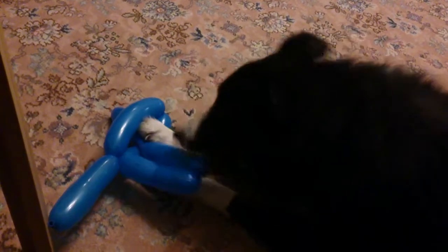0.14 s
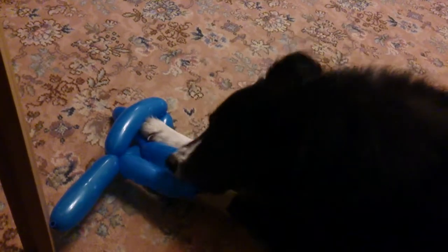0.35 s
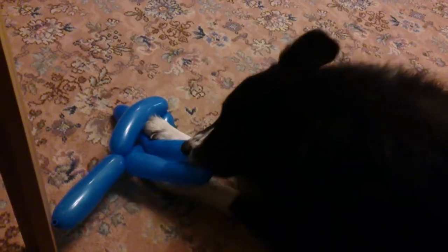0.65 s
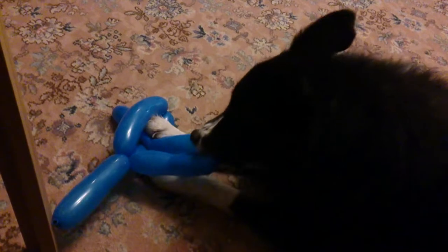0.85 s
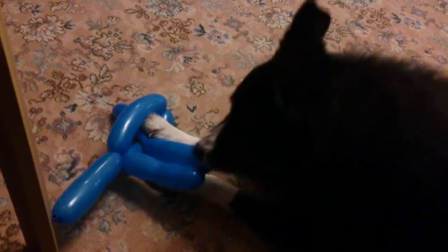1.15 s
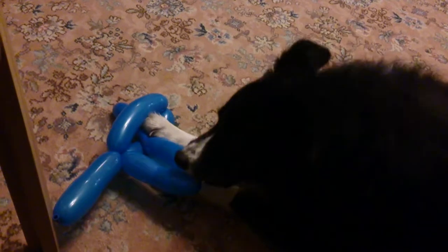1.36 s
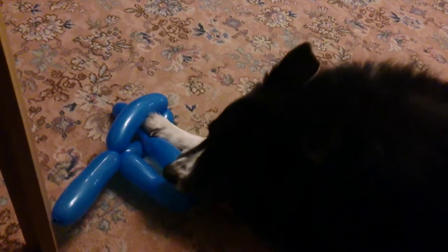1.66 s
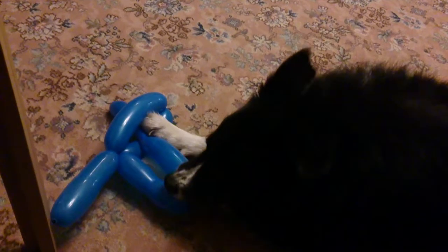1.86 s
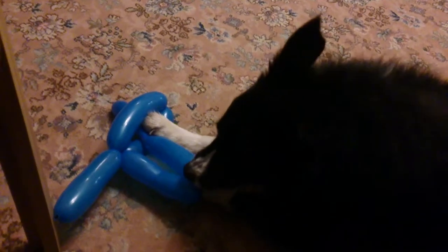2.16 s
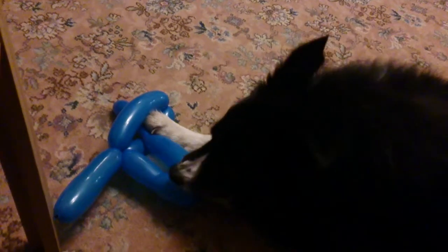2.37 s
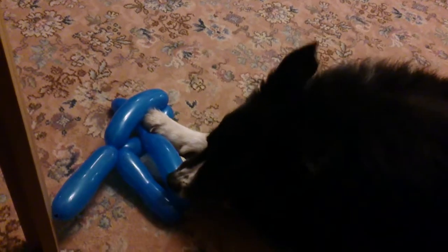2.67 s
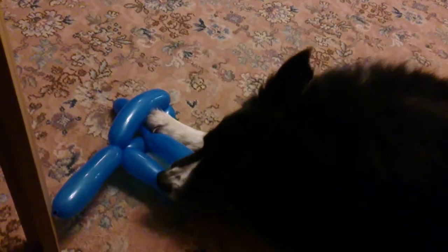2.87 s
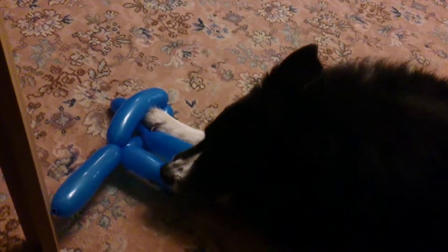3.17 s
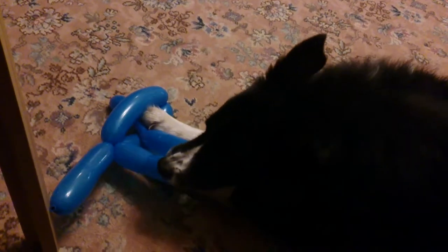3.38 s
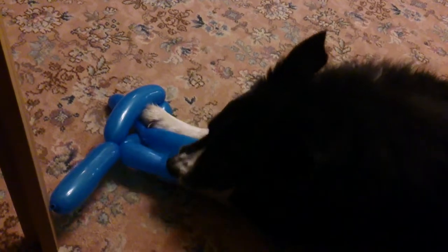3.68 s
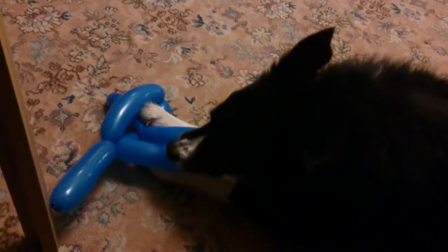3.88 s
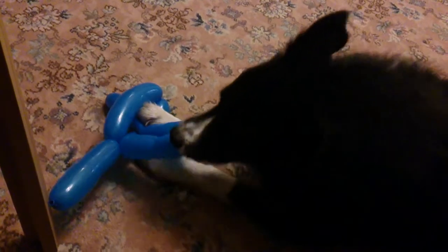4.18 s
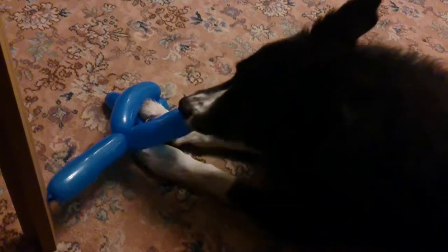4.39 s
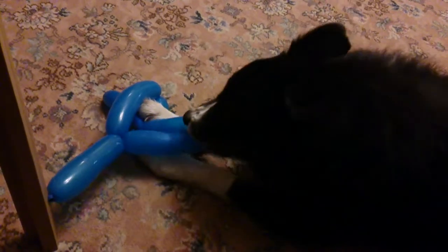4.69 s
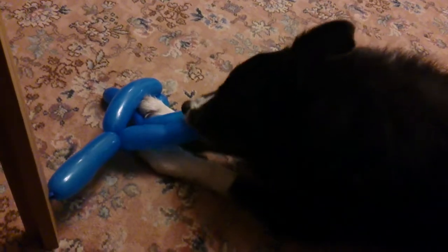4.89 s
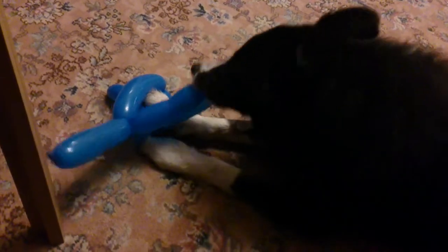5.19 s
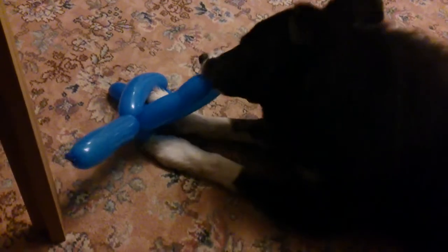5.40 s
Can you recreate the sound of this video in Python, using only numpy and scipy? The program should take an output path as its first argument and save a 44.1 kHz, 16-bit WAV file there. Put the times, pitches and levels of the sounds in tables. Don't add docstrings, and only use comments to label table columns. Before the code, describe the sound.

A dog gnaws a twisted latex balloon close by, with rubbery creaks, dry crackling scrapes, brief squeals and sharp snaps in a small room.

```python
import sys
import numpy as np
from scipy import signal
from scipy.fft import rfft, irfft, next_fast_len
from scipy.io import wavfile
from scipy.ndimage import uniform_filter1d, map_coordinates

SR = 44100
rng = np.random.default_rng(int(sys.argv[2]) if len(sys.argv) > 2 else 0)


def to_wav(sig):
    pcm = np.clip(np.atleast_2d(sig), -1, 1) * 32767
    pcm = np.round(pcm).astype(np.int16)
    wavfile.write(sys.argv[1], SR, pcm.T)


def rack_gain(trim_db):
    fader = np.asarray(trim_db, float)
    return 10 ** (fader / 20)


N = 244314

# t/s, skin level/dB, air tube minus skin/dB, crackle minus skin/dB
SNAPS = [(.0337, -18.5, 5.5, -32), (.049, -13.5, -23, -5), (.0605, -28, -14, -30), (.34, -26.5, -28, -4),
         (.972, -4.5, -8, -1), (.9887, -7, 1, -4.5), (1.3811, -17, -2, -8.5), (1.4422, -18.5, -2.5, -10),
         (1.5429, -14, -7, -3.5), (1.6873, -19, -43, -26), (1.8443, -27, -13, -19), (2.1735, -9, -4.5, 4.5),
         (2.4716, -17, -8, 0), (2.6786, -12.5, 1, 4.5), (3.4091, -10.5, -3.5, -3.5),
         (3.4489, -32.5, 10.5, -4), (3.9267, -19, -11.5, -5), (3.9953, -24.5, -5, -36),
         (4.0139, -19, -4, -11), (4.0436, -26.5, -0.5, -9), (4.329, -24.5, -6.5, 2),
         (4.3618, -11.5, -2.5, -12), (4.3745, -38, 19, -16), (4.4745, -29, -3, -5.5),
         (4.8129, -25, -2.5, -5.5), (4.9434, -16.5, -5, -9.5), (5.079, -15.5, -10.5, 2.5),
         (5.3417, -14, -3, -4.5), (5.355, -40.5, -28, -21)]
# t/s, skin level/dB, crackle minus skin/dB
NIBBLES = [(.3328, -38, -2.5), (1.321, -33.5, -14), (2.3814, -33, -14.5), (2.777, -28, -9),
           (3.5203, -36.5, -13), (4.6851, -26.5, -32.5), (5.1914, -39.5, 14), (5.2084, -34, 3),
           (.23, -55, 12), (.286, -58, 12), (5.316, -51, -1)]
# t/s, skin level/dB, crackle minus skin/dB
GRIPS = [(1.373, -24.5, -12), (2.4, -31, -14), (2.9841, -25.5, -28), (3.02, -23.5, -16),
         (3.0369, -22.5, -8), (3.058, -26, -14.5), (3.0704, -39, 0), (3.1899, -20.5, -7.5),
         (3.2069, -20.5, -12), (4.082, -29, -19), (5.1788, -37, 9), (4.752, -28, -11)]
NIBBLE_TUBE_DB, GRIP_TUBE_DB = -26, -1

# start t/s, end t/s, start skin level/dB, end skin level/dB, crackle minus skin/dB
SCRAPES = [(0.412, 0.48, -36, -44.5, -10), (0.476, 0.572, -38, -39, -13), (0.572, 0.62, -40, -41, -12),
           (0.62, 0.71, -43, -49, -16), (0.724, 0.77, -43, -49, -18), (0.77, 0.883, -46, -45, -20),
           (.883, 0.968, -43, -46, -20), (1.318, 1.331, -52, -42, -21), (1.347, 1.377, -42, -28.5, -10.5),
           (1.54, 1.646, -33.5, -41, -11), (1.648, 1.701, -40, -49.5, 9), (1.881, 1.902, -48, -44, -26),
           (1.898, 1.935, -39, -39.5, -9.5), (2.782, 2.807, -32, -46, -20), (2.832, 2.864, -41, -38, -14),
           (2.959, 3.02, -41.5, -27, -22), (3.017, 3.097, -31, -36, -23), (3.183, 3.205, -24.5, -47, -20),
           (3.758, 3.803, -41.5, -36.5, -14), (3.808, 3.89, -37.5, -39.5, -13),
           (3.888, 3.917, -37, -41.5, -16), (4.203, 4.242, -63, -42.5, -0.5), (4.65, 4.772, -36, -39, -29),
           (4.796, 4.951, -39, -35, -22), (4.973, 5.08, -44.5, -43.5, -12)]
# start t/s, end t/s, start skin level/dB, end skin level/dB
RUBS = [(0, 0.024, -29.5, -45), (0.018, 0.06, -44, -23), (.105, 0.327, -62, -68),
        (0.325, 0.355, -39, -43.5), (0.392, 0.43, -45, -27), (1.185, 1.32, -59, -64),
        (1.404, 1.535, -47.5, -48.5), (1.708, 1.806, -48, -40), (1.932, 2.128, -48, -53),
        (2.225, 2.292, -33, -65), (2.303, 2.377, -48, -48), (2.394, 2.46, -41, -35.5),
        (2.46, 2.557, -28, -50), (2.546, 2.685, -40, -46.5), (2.747, 2.797, -71, -50),
        (2.872, 2.947, -35.5, -45), (3.1, 3.126, -32, -44.5), (3.152, 3.16, -31, -49),
        (3.219, 3.408, -44, -46), (3.664, 3.742, -67, -66), (3.948, 4.005, -49.5, -54),
        (4.007, 4.158, -42, -51), (4.163, 4.327, -58, -51.5), (4.519, 4.662, -54.5, -41),
        (5.08, 5.225, -40.5, -53.5), (5.208, 5.332, -53.5, -56), (5.397, 5.536, -67, -71.5)]
SCRAPE_TUBE_DB, RUB_TUBE_DB, RUB_CRACKLE_DB = -8, -1, -15

# t/s, length/s, level/dB, crackle minus skin/dB
CHATTERS = [(.438, .004, -32, -1.5), (.451, 0.003, -30.5, -9.5), (.4784, 0.0032, -25.5, -5),
            (.483, .003, -29, -8), (.495, .005, -21, -17.5), (.539, 0.0034, -28, -10.5),
            (.59, .004, -23.5, -19), (3.088, 0.002, -35, -3), (3.182, 0.0025, -27, -20.5),
            (.631, 0.0033, -29.5, -13), (.636, 0.0082, -26.5, -23.5), (.645, 0.003, -22, -28),
            (.678, 0.0064, -26.5, -22.5), (.687, 0.0035, -26.5, -22.5), (.723, 0.0043, -22.5, -23),
            (.733, 0.0051, -30, -20), (.77, 0.011, -32, -15), (.778, 0.0055, -28, -9.5),
            (.789, .003, -38, -2), (.807, 0.0047, -30.5, -15.5), (.818, 0.0059, -28, -17.5),
            (.83, .004, -42.5, -7.5), (.849, 0.0093, -29.5, -24), (.861, 0.0047, -36, -14.5),
            (.87, 0.0022, -39, -20), (.889, .006, -30, -22), (.901, .003, -40, -18),
            (.912, .003, -37, -9.5), (.934, .002, -43, -8), (.943, .003, -42, -10.5),
            (.953, .003, -46, -20.5), (.962, .003, -41.5, -12.5), (1.62, 0.011, -37, -0.5),
            (1.737, 0.0027, -33.5, -6), (1.747, .004, -31, -13), (1.758, .005, -27.5, -13),
            (1.78, 0.0017, -34, -10), (1.785, 0.0017, -29, -13), (1.791, 0.003, -28.5, -17),
            (2.507, 0.0033, -29, -15), (2.5274, 0.0045, -25, -21), (2.539, 0.0038, -27, -18),
            (2.559, 0.0027, -40.5, -10.5), (2.578, 0.0047, -32, -9), (2.831, 0.002, -22, -11.5),
            (2.843, 0.0072, -31, -20), (2.911, .003, -35.5, -4), (2.924, 0.0035, -40.5, -1),
            (2.937, 0.0027, -42, -6)]
# t/s, length/s, level/dB, crackle minus skin/dB
NIPS = [(.422, 0.0055, -33.5, -2), (.512, 0.0065, -21.5, -5), (.522, 0.0021, -22, -16.5),
        (.5315, 0.0034, -22, -7), (.545, 0.0042, -28, -10), (.5555, 0.0027, -18.5, -13.5),
        (.584, 0.0033, -19, -16), (.605, 0.0026, -21.5, -25)]
# t/s, length/s, level/dB, crackle minus skin/dB
GNAWS = [(2.45, 0.0047, -25.5, -14.5), (2.461, 0.0028, -20.5, -12), (2.482, 0.0093, -28.5, -17.5),
         (2.491, 0.0037, -31, -26), (3.093, 0.0056, -28.5, -25), (3.101, 0.004, -19.5, -21),
         (3.109, 0.0025, -26, -20), (3.153, 0.0043, -32, -18), (3.249, 0.0031, -36, -6),
         (3.2664, 0.0018, -23, -20), (3.2889, 0.0019, -30, -17), (3.298, 0.0039, -30.5, -18),
         (3.31, 0.0026, -38.5, -14), (3.3313, 0.0037, -34.5, -12), (3.3592, 0.0049, -30, -22.5),
         (3.3692, 0.0018, -32, -16.5), (3.385, 0.0028, -27, -23), (3.394, 0.0033, -35.5, -10),
         (1.936, 0.0017, -52.5, -10), (1.943, 0.0028, -47.5, -10), (1.954, 0.0029, -30, -17),
         (1.967, 0.0041, -49, -5), (1.984, 0.0061, -33, -19), (2.001, 0.0036, -30, -12.5),
         (2.031, 0.0063, -32.5, -11), (2.0494, 0.0029, -28, -11.5), (2.0744, 0.0095, -31.5, -18),
         (2.088, .003, -38, -13.5), (2.0998, 0.0061, -28.5, -22.5), (2.8727, 0.0047, -25.5, -13),
         (2.877, 0.0025, -23, -11.5), (2.883, 0.0026, -37, -7), (2.893, 0.003, -31, -10),
         (2.904, 0.0054, -29, -16), (3.1417, 0.003, -23, -19), (3.236, 0.0022, -26.5, -22)]
CHATTER_TUBE_DB, NIP_TUBE_DB, GNAW_TUBE_DB = -13.5, -10, -3.5
GRAB_S, LET_GO_S = .0003, .0005

# t/s, slip rate f/Hz, level/dB, unevenness 0-1
SQUEALS = [
    [(1.645, 1000, -48, .1), (1.655, 1500, -40, .07), (1.666, 2500, -33, .05), (1.672, 3200, -35, .05),
     (1.676, 3600, -50, .03)],
    [(2.781, 3700, -44, .03), (2.785, 3150, -31, .03), (2.79, 2250, -37, .03), (2.796, 1500, -32, .05),
     (2.808, 900, -35, .08), (2.816, 1100, -34, .1), (2.821, 1250, -35, .12), (2.828, 1300, -39, .2)],
    [(2.843, 640, -36, .04), (2.852, 625, -34, .04), (2.858, 610, -40, .06), (2.869, 600, -46, .1)],
    [(3.757, 620, -52, .04), (3.764, 620, -45, .05), (3.79, 630, -46, .12), (3.81, 690, -43, .1),
     (3.845, 670, -44, .18), (3.868, 625, -43.5, .08), (3.885, 700, -43, .08), (3.895, 1400, -44, .03),
     (3.903, 2200, -46, .03)],
]
# t/s, f/Hz, peak level/dB, t60/s
TWANGS = [(0.034, 1017, -16.5, 0.07), (0.973, 4120, -9.5, 0.046), (0.9866, 1683, 9, 0.014),
          (0.988, 607, -7, 0.061), (1.688, 3120, -14, 0.015), (2.174, 750, -9, 0.067),
          (2.679, 3880, -2.5, 0.012), (4.363, 741, -24.5, 0.24), (0.053, 2256, -35, 0.15),
          (5.079, 3620, -14, 0.019), (5.081, 4080, -22, .03), (5.3401, 3330, -14.5, .025),
          (5.354, 2250, -35, 0.035), (2.8315, 3160, -17, .012), (2.873, 3570, -21.5, 0.033),
          (4.365, 1500, -24.5, 0.1), (5.343, 1056, -17, 0.079)]
# t/s, peak level/dB, f/Hz, t60/s
THUDS = [(0.04, -30, 79, 0.076), (2.168, -31, 75, 0.13), (1.741, -37, 102, 0.14), (4.618, -37, 150, 0.091),
         (0.042, -23, 190, 0.098), (0.969, -13.5, 121, 0.019), (0.989, -20, 84.8, 0.028),
         (1.371, -34, 313, 0.19), (1.439, -63, 350, 0.11), (1.536, -15, 200, 0.045),
         (1.537, -28, 105, 0.058), (1.787, -42, 267, 0.066), (2.169, -16, 97, 0.027),
         (2.464, -36, 123, 0.09), (2.674, -17, 192, 0.054), (2.902, -33, 86, 0.097),
         (3.415, -33, 125, 0.084), (3.445, -28, 143.2, 0.072), (3.922, -35.5, 156, 0.099),
         (4.006, -26, 190, 0.048), (4.357, -38.5, 147, 0.35), (4.939, -25.5, 164, 0.041),
         (5.076, -33, 167, 0.082), (5.335, -36, 191, 0.1)]
# t/s, length/s, f/Hz, level/dB
HUMS = [(.235, .085, 770, -53), (1.25, .1, 300, -53), (2.26, .14, 310, -51), (4.1, .16, 670, -51),
        (4.14, .17, 720, -51), (5.275, .016, 700, -49), (5.309, .016, 680, -48), (5.212, .016, 680, -48),
        (4.06, .11, 250, -50), (4.29, .07, 200, -55), (1.9, .24, 640, -50), (.19, .13, 210, -61),
        (.2, .12, 380, -63), (3.755, .05, 640, -44)]

# f/Hz, width/Hz, level/dB
SKIN = [(1314, 384, 0), (1775, 210, 4.5), (2152, 460, 3.5), (2727, 374, 4.5), (3255, 1006, 1),
        (4103, 1510, -0.5), (4844, 1160, -5.5)]
# f/Hz, width/Hz, level/dB
TAUT = [(1170, 230, -4.5), (1900, 870, -2.5), (2250, 140, 3.5), (2610, 170, 3.5), (3200, 780, -1.5),
        (4100, 610, -4)]
# f/Hz, width/Hz, level/dB
SLIDING = [(800, 600, -4), (1400, 450, 1), (1900, 600, 4), (2500, 500, 4), (3300, 900, -1), (4200, 800, -1)]
# f/Hz, width/Hz, level/dB
TUBE = [(260, 425, -8), (636, 153, 1.5), (791, 78, 3), (1160, 231, 0)]
# f/Hz, width/Hz, level/dB
PINCHED = [(298.5, 380, -10), (654, 120, 0), (780, 39, 0.5), (1240, 280, -0.5)]
# f/Hz, width/Hz, level/dB
CRACKLE = [(5600, 3100, 1), (9370, 1300, 7.5), (11700, 2300, -2.5), (14100, 310, -16.5)]

# f/Hz, share 0-1
SCATTERED = [(1000, .05), (1900, .08), (2400, .5), (3200, .3), (3800, .15), (5000, .55), (9000, .7)]
# f/Hz, t60/s
ROOM = [(100, 0.2), (300, 0.29), (800, 0.25), (2000, 0.25), (5000, 0.2), (12000, 0.15)]
# f/Hz, share 0-1
SHARED = [(60, .95), (250, .75), (700, .35), (1500, .1), (4000, .05)]
SCATTER_T60_S = .005
CHATTER_ROOM_DB, SQUEAL_ROOM_DB = -8, -6
# f/Hz, left minus right level/dB
PORTS = [(500, -2.5), (1700, -4.5), (2500, -7), (3400, -0.5), (5000, 10.5), (7300, 9), (9000, 18.5),
         (14000, 16.5)]
# f/Hz, phase/rad
LEAD = [(0, .45), (720, .5), (1550, 2.8), (2600, 4), (3600, 6.1), (4050, 6.3), (7900, 23.8), (16000, 48)]
# f/Hz, level/dB
TOP = [(12000, -5), (13000, -11), (14900, -10.5), (15400, -20), (16400, -36), (16700, -66)]

# f/Hz, density level/dB per Hz
HISS = [(88, -34.5), (150, 14), (480, -9.5), (941, -4), (2920, -16.5), (6500, -27), (9500, -27),
        (14800, -31)]
# f/Hz, density level/dB per Hz
RUMBLE = [(10, -2), (25, -7.5), (60, -24), (120, -17.5), (250, -44.5)]
# t/s, level/dB
RUMBLE_DB = [(0.0, -48), (0.62, -52), (1.03, -42), (1.14, -53), (4.75, -58.5), (4.81, -46), (5.54, -56)]


def latex():
    s, skin_db, tube_db, crackle_db = slips()
    drag_skin, drag_tube, drag_crackle = strokes()
    skin_grit = shifting(grit(rate=3500, spread_db=0.5, clump_db=2.2), depth_db=2.8)

    skin = bursts(s, skin_db, skin_db - 1.0, life=0.001031)
    skin = skin + rack_gain(5.5) * drag_skin * skin_grit

    tube = bursts(s, skin_db, skin_db + tube_db + 1.0, life=0.0008)
    tube = tube + rack_gain(5.0) * drag_tube * grit(rate=2400, spread_db=0.0, clump_db=1.5)

    crackle = bursts(s, skin_db, skin_db + crackle_db - 7.0, life=0.00075)
    wrinkle_grit = 0.46 * skin_grit + 2.02 * grit(rate=5800, spread_db=0.0, clump_db=3.5)
    crackle = crackle + rack_gain(-7.0) * drag_crackle * wrinkle_grit
    return resonant(skin, SKIN) + resonant(tube, TUBE) + resonant(crackle, CRACKLE)


def slips():
    nibbles = [(s, db, NIBBLE_TUBE_DB, crackle) for s, db, crackle in NIBBLES]
    grips = [(s, db, GRIP_TUBE_DB, crackle) for s, db, crackle in GRIPS]
    return np.concatenate([SNAPS, nibbles, grips]).T


def bursts(s, skin_db, level_db, life):
    t = np.arange(SR // 50) / SR
    lives = life * rack_gain(.15 * (skin_db + 26.0))[:, None]
    shape = rack_gain(level_db)[:, None] * t / lives * np.exp(1 - t / lives)
    signs = np.sign(rng.standard_normal(shape.shape))
    force = shape * signs * rack_gain(1.3 * rng.standard_normal(shape.shape))
    at = np.round((s[:, None] - lives) * SR).astype(int) + np.arange(len(t))
    direct = np.bincount(at.ravel(), force.ravel(), N + SR)[:N]
    strength = np.linalg.norm(force, axis=1) * rack_gain(.15 * (skin_db + 12))
    blow = np.bincount(np.round(s * SR).astype(int), strength, N)
    return np.array([direct, blow])


def strokes():
    out, t = np.zeros((3, N)), np.arange(N) / SR
    rubs = [(*row, RUB_TUBE_DB, RUB_CRACKLE_DB) for row in RUBS]
    scrapes = [(*row, SCRAPE_TUBE_DB, crackle_db) for *row, crackle_db in SCRAPES]
    for start, end, from_level, to_level, tube_db, crackle_db in rubs + scrapes:
        part = slice(round(start * SR), round(end * SR))
        skin_db = np.interp(t[part], [start, end], [from_level, to_level])
        out[:, part] = rack_gain(skin_db + [[0], [tube_db], [crackle_db]])
    return uniform_filter1d(out, SR // 400, axis=1)[:, None] * rack_gain([[-1.5], [-5]])


def grit(rate, spread_db, clump_db):
    hit = rng.random(N) < rate / SR
    size = rack_gain(spread_db * rng.exponential(size=N) + clump_db * wobble(160))
    return unit(hit * size * rng.standard_normal(N))


def shifting(x, depth_db):
    z = signal.stft(x, nperseg=256)[2]
    field = uniform_filter1d(rng.standard_normal(z.shape), size=3, axis=0)
    field = uniform_filter1d(field, size=16, axis=1)
    return unit(signal.istft(z * rack_gain(depth_db * unit(field)), nperseg=256)[1][:N])


def chatters():
    force, t = np.zeros((3, N)), np.arange(SR // 40) / SR
    kinds = ((CHATTERS, CHATTER_TUBE_DB), (NIPS, NIP_TUBE_DB), (GNAWS, GNAW_TUBE_DB))
    for rows, tube_db in kinds:
        for s, length, db, crackle_db in rows:
            release = np.exp(-np.maximum(t - length, 0) / LET_GO_S)
            shape = (1 - np.exp(-t / GRAB_S)) * release
            gains = rack_gain(db + np.array([[0], [tube_db], [crackle_db]]))
            force[:, round(s * SR):][:, :len(t)] += gains * shape
    signs = np.sign(rng.standard_normal((3, N)))
    force = force * signs * rack_gain(1.5 * rng.standard_normal((3, N)) + .8 * wobble(600))
    return resonant(force[0], TAUT) + resonant(force[1], PINCHED) + resonant(force[2], CRACKLE)


def squeals():
    out = np.zeros(N)
    for rows in SQUEALS:
        rate, db, uneven = curves(rows)
        phase = 2 * np.pi * np.cumsum(rate * (1 + uneven * wobble(500))) / SR
        live = (np.arange(N) > rows[0][0] * SR) & (np.arange(N) < rows[-1][0] * SR)
        pulses = np.zeros(N)
        for k in range(1, 10):
            pulses += rack_gain(-.9 * k) * np.cos(k * phase) * (k * rate < SR / 3)
        out += live * rack_gain(db + 2.5 * wobble(240)) * pulses
    return resonant(out, SLIDING) + rack_gain(-12) * resonant(out, TUBE) + rack_gain(-16) * resonant(out, CRACKLE)


def twangs():
    out, t = np.zeros(N + SR), np.arange(SR // 10) / SR
    for s, hz, db, t60 in TWANGS:
        drift = 0.13 * np.cumsum(rng.standard_normal(len(t)))
        decay = rack_gain(db - 60 * t / t60) * (1 - np.exp(-t / 0.00018))
        out[round(s * SR):][:len(t)] += decay * np.sin(2 * np.pi * hz * t + drift)
    return out[:N]


def thuds():
    out, t = np.zeros(N + SR), np.arange(SR // 4) / SR
    dull = filtered(rng.standard_normal(N), lambda hz: (hz > 70) / (1 + (hz / 300) ** 4))
    dull = unit(dull)
    for s, db, hz, t60 in THUDS:
        swing = np.sin(2 * np.pi * hz * t) * rack_gain(-60 * t / 1.2)
        push = swing + 0.68 * np.resize(dull[round(s * SR):], len(t))
        decay = rack_gain(db - 60 * t / t60) * (1 - np.exp(-t / 0.00036))
        out[round((s + .008) * SR):][:len(t)] += decay * push
    waver, drift = wobble(70), wobble(54)
    for s, length, hz, db in HUMS:
        at = round(s * SR / 2)
        swell = np.sin(np.pi * np.clip(t / length, 0, 1)) ** 2
        tone = np.sin(2 * np.pi * hz * t + 1.1 * drift[at:][:len(t)])
        out[round(s * SR):][:len(t)] += rack_gain(db + 3 * waver[at:][:len(t)]) * swell * tone
    return out[:N]


def scattered(x):
    out, step, t = np.zeros((2, N + SR)), SR // 8, np.arange(SR // 200) / SR
    for start in range(0, N, step):
        tail = rng.standard_normal((2, len(t))) * rack_gain(-60 * t / SCATTER_T60_S)
        tail = tail / np.linalg.norm(tail, axis=1, keepdims=True)
        wet = signal.fftconvolve(x[None, start:start + step], tail, axes=1)
        out[:, start:][:, :wet.shape[1]] += wet
    straight = filtered(x, lambda hz: np.sqrt(1 - along(SCATTERED, hz)))
    return straight + filtered(out[:, :N], lambda hz: np.sqrt(along(SCATTERED, hz)))


def room(x):
    out, step = np.zeros((2, N + SR)), SR // 5
    for start in range(0, N, step):
        hz, t, z = signal.stft(rng.standard_normal((2, SR // 3)), SR, nperseg=256)
        decay = rack_gain(-60 * t / along(ROOM, hz)[:, None])
        tail = signal.istft(z * decay, SR, nperseg=256)[1]
        wet = signal.fftconvolve(x[None, start:start + step], tail / np.linalg.norm(tail[0]), axes=1)
        out[:, start + SR // 300:][:, :wet.shape[1]] += wet

    def split(hz):
        turn = np.arccos(np.clip(along(SHARED, hz), 0, 1)) / 2
        return np.array([np.cos(turn), np.sin(turn)])
    return filtered(out[:, :N], split)


def background():
    a, b, c, d = rng.standard_normal((4, N))
    hiss = unit(filtered(np.array([a + 0.22 * b, a - 0.34 * b]), lambda hz: rack_gain(along(HISS, hz))))
    low = unit(filtered(np.array([c + 0.44 * d, c - 1.0 * d]), lambda hz: rack_gain(along(RUMBLE, hz))))
    return rack_gain(-66.5) * hiss + rack_gain(curves(RUMBLE_DB)[0] + 1.8 * wobble(2.7)) * low


def resonant(x, modes):
    def response(f):
        h = 0
        for k, (centre, width, db) in enumerate(modes):
            mode = 1j * f * width / (centre * centre - f * f + 1j * f * width)
            h = h + (-1) ** k * rack_gain(db) * mode
        return h / np.sqrt(np.mean(abs(h) ** 2))
    return filtered(x, response)


def filtered(x, response):
    m = next_fast_len(N + SR // 2)
    return irfft(rfft(x, m) * response(np.fft.rfftfreq(m, 1 / SR)), m)[..., :N]


def unit(x):
    return x / np.sqrt(np.mean(x ** 2) + 1e-20)


def along(points, hz):
    f, v = np.transpose(points)
    return np.interp(np.log(hz + 1), np.log(f + 1), v)


def curves(rows):
    s, *cols = np.transpose(rows)
    return [np.interp(np.arange(N) / SR, s, c) for c in cols]


def wobble(rate):
    knots = rng.standard_normal(int(N * rate / SR) + 4)
    return map_coordinates(knots, [np.arange(N) * rate / SR])


def scene():
    near, radiated = latex()
    squeal, ring, chatter = squeals(), twangs(), chatters()
    low = filtered(thuds(), lambda hz: 1j * hz / (60 + 1j * hz))
    sent = radiated + rack_gain(CHATTER_ROOM_DB) * chatter + rack_gain(SQUEAL_ROOM_DB) * squeal
    shared, differing = rack_gain(-4.0) * room(sent + 0.44 * ring + 0.8 * low)
    side = np.array([[.5], [-.5]])

    def port(hz):
        lead = np.interp(hz, *np.transpose(LEAD))
        return rack_gain(side * along(PORTS, hz)) * np.exp(1j * side * lead)
    direct = scattered(near + chatter + squeal) + ring + low
    return filtered(direct + shared + 2 * side * differing, port) + background()


def band_limit(x):
    return signal.sosfilt(signal.butter(12, 16480, fs=SR, output="sos"), x)


def record(dry):
    x = filtered(dry, lambda hz: rack_gain(along(TOP, hz)))
    mix = x / (1 + abs(x) ** 12) ** (1 / 12)
    return band_limit(mix)


dry = scene()
out = record(dry)
to_wav(out)
```